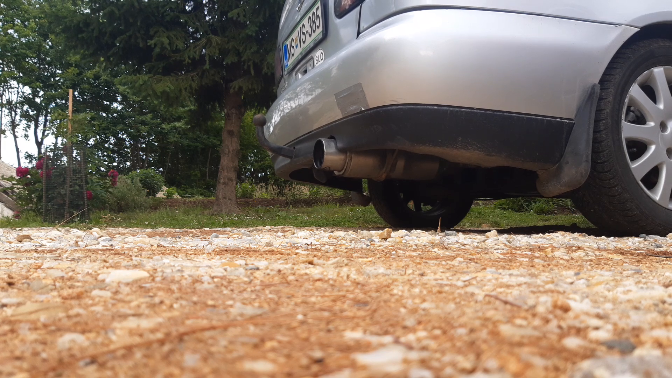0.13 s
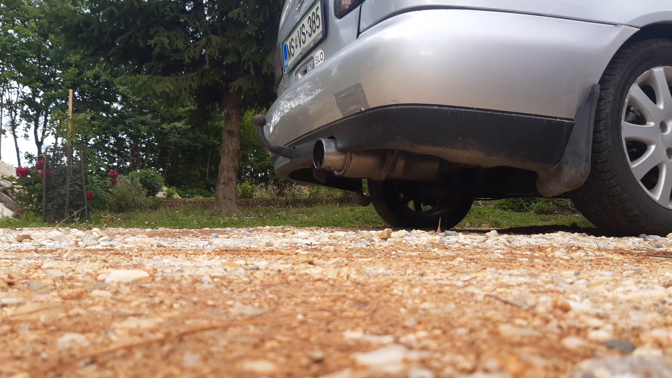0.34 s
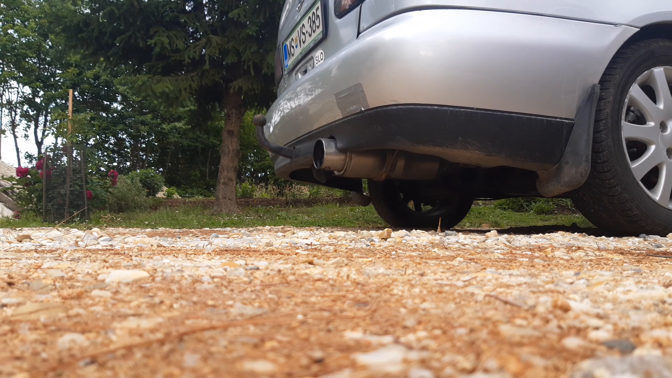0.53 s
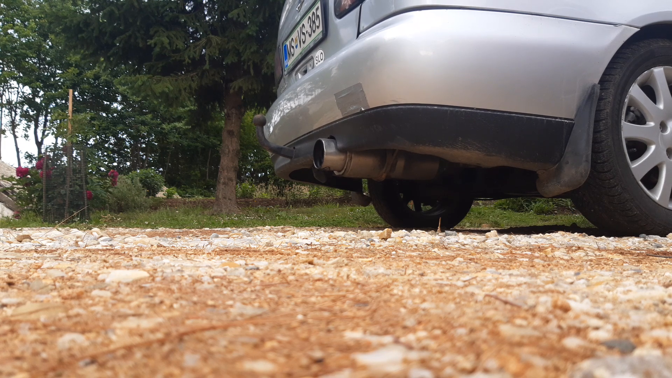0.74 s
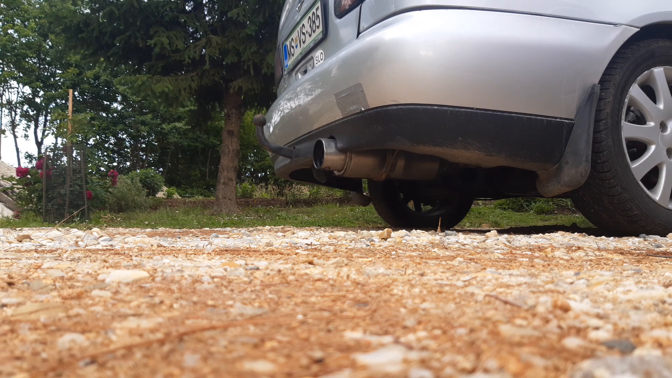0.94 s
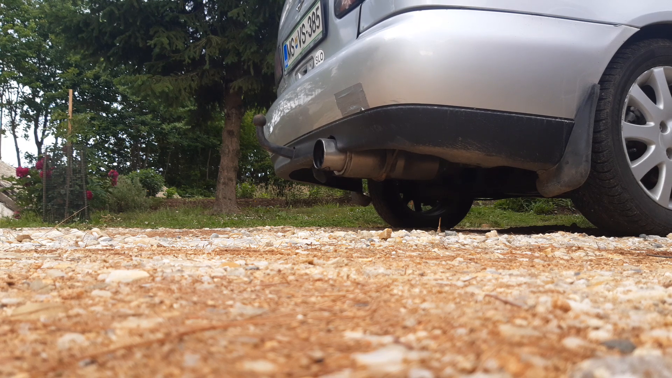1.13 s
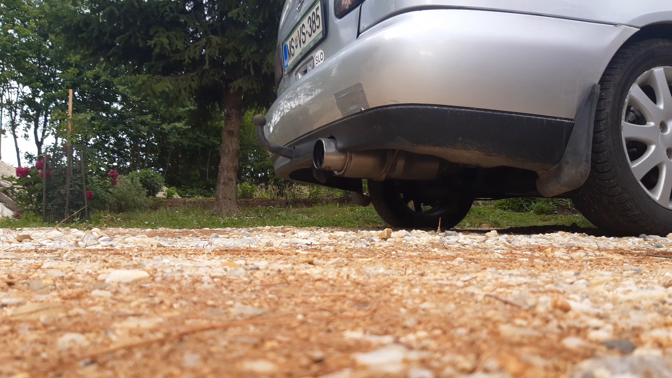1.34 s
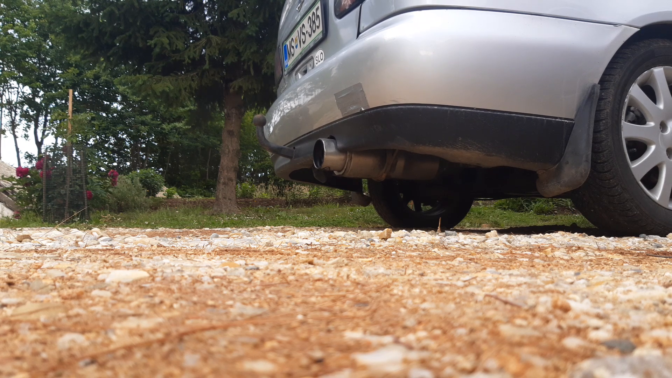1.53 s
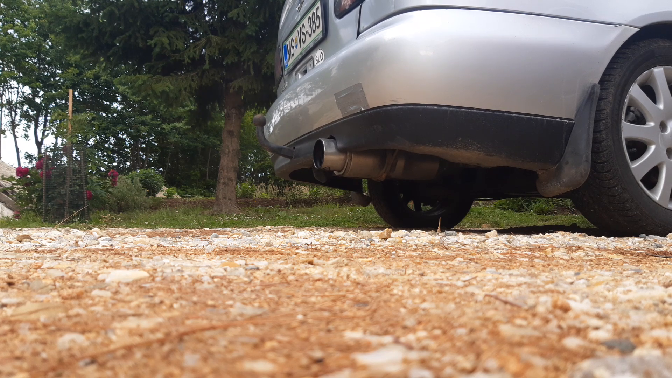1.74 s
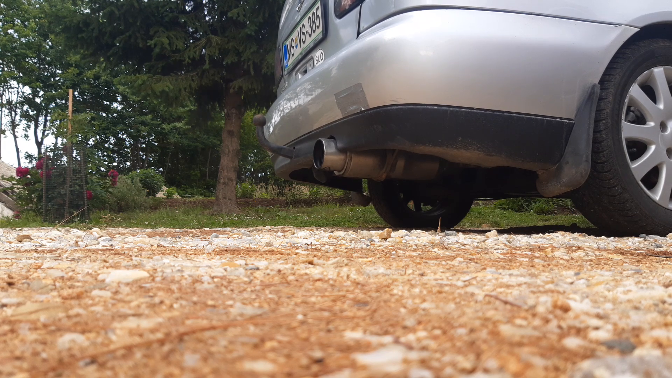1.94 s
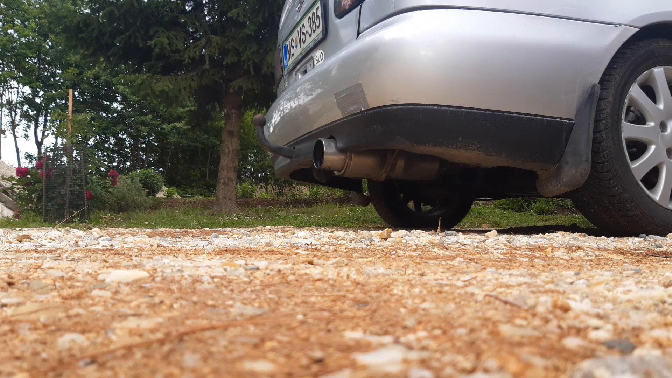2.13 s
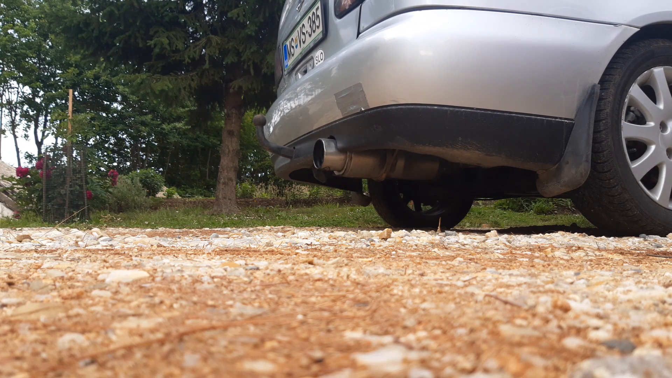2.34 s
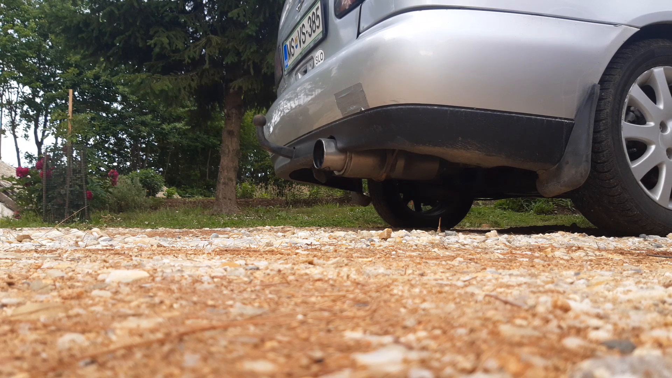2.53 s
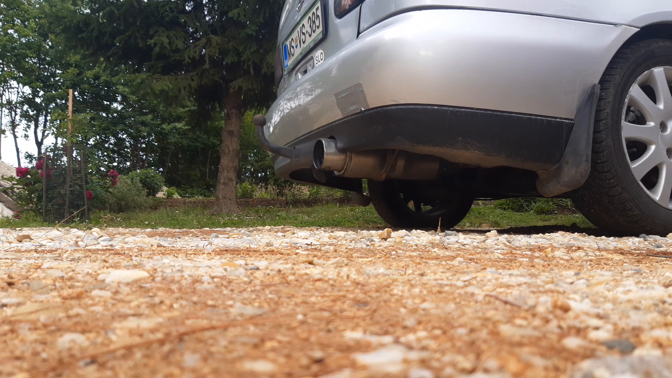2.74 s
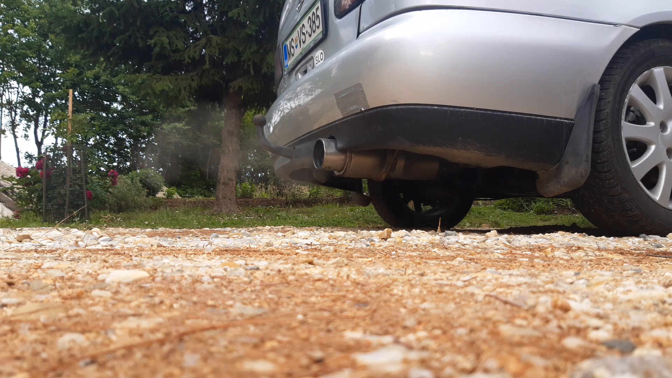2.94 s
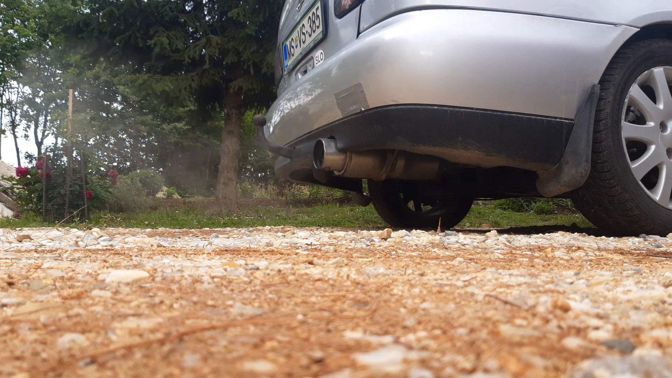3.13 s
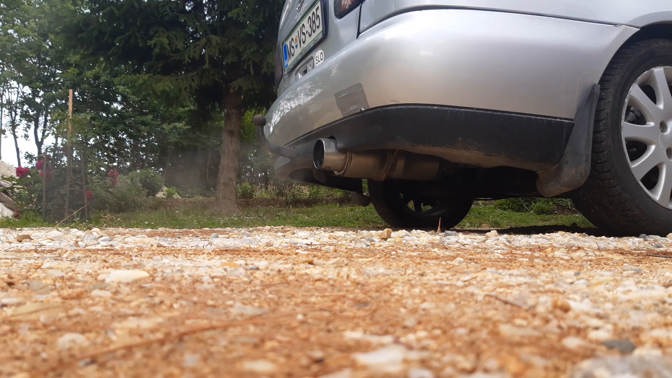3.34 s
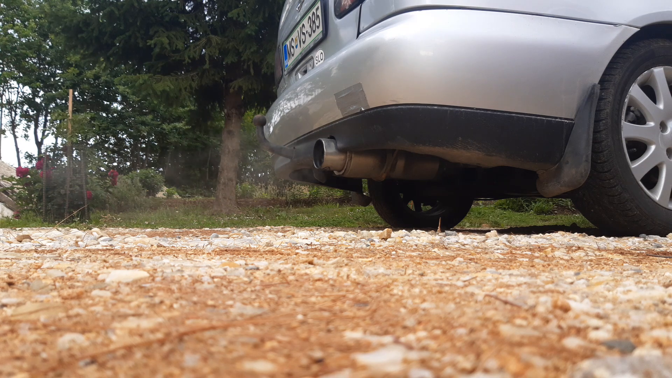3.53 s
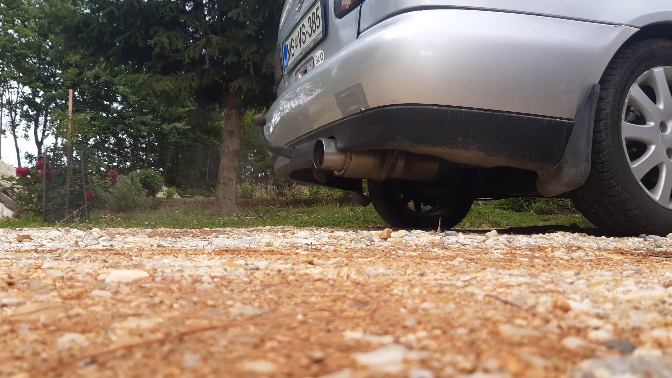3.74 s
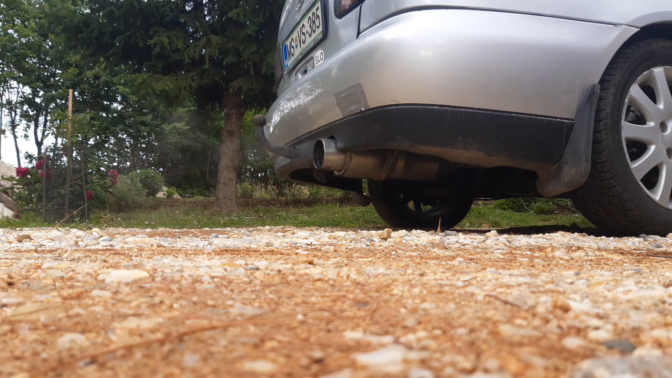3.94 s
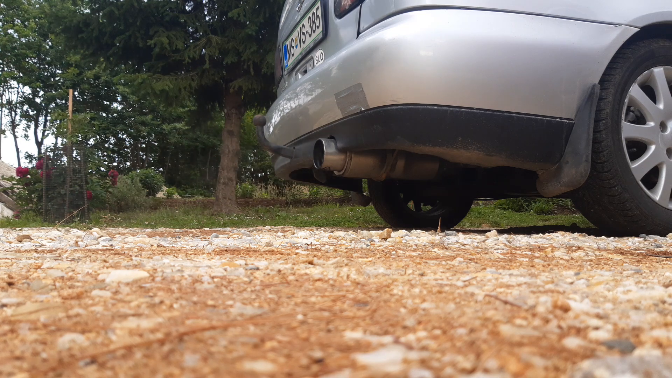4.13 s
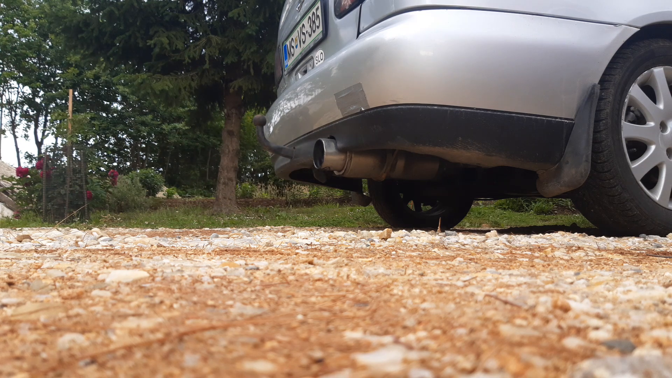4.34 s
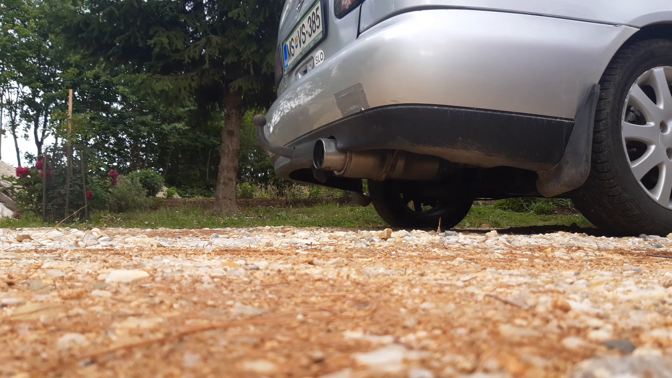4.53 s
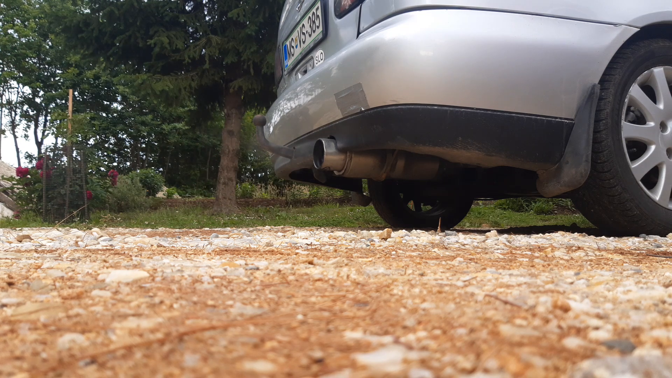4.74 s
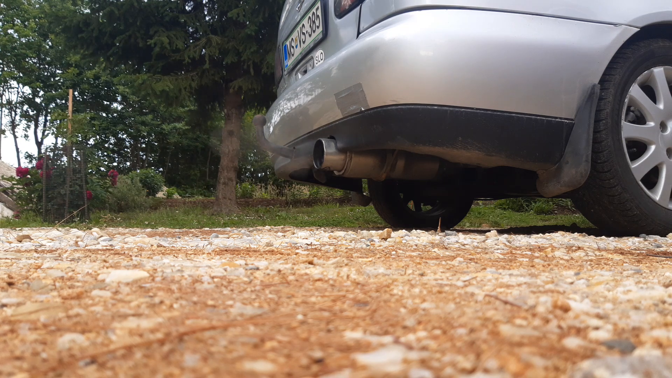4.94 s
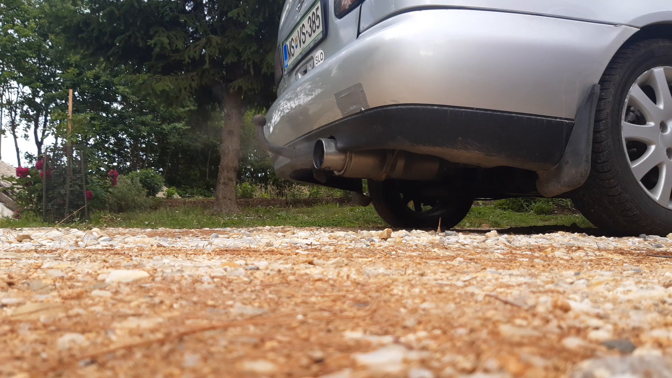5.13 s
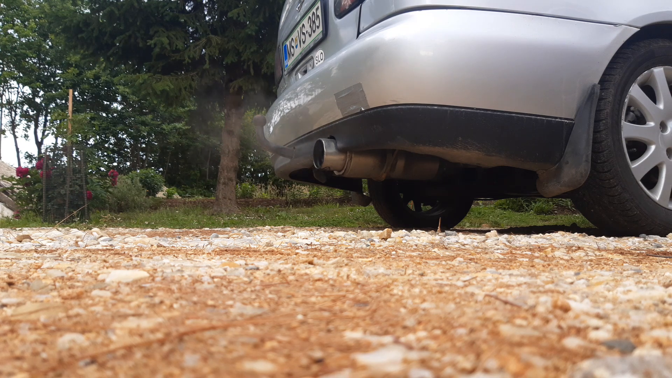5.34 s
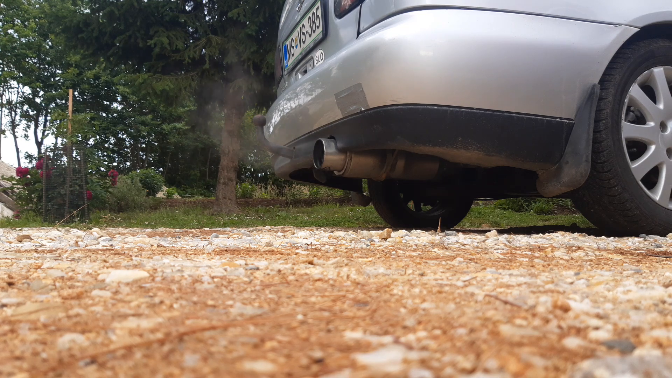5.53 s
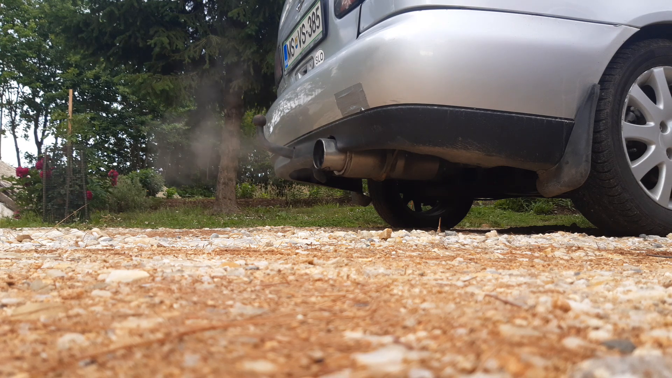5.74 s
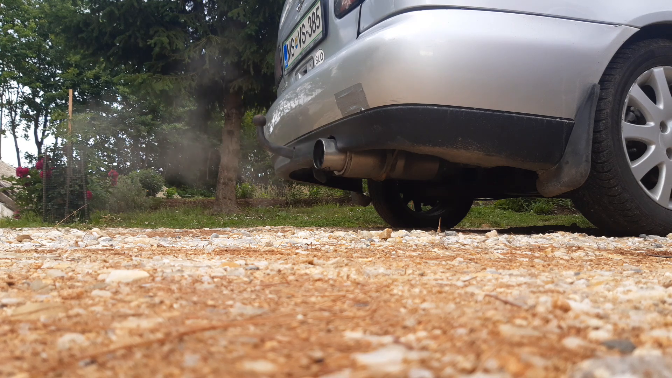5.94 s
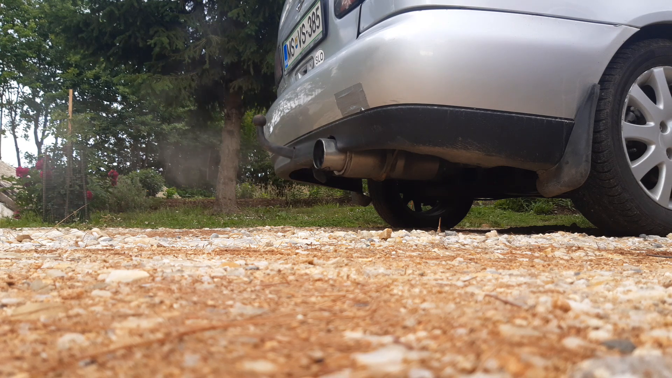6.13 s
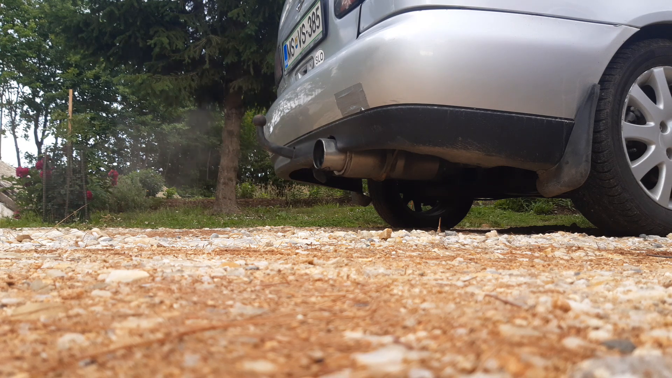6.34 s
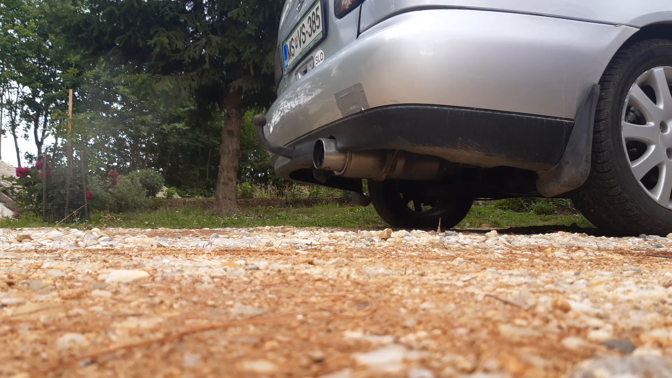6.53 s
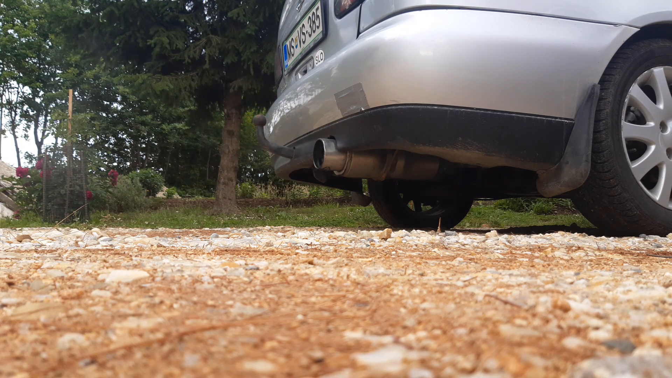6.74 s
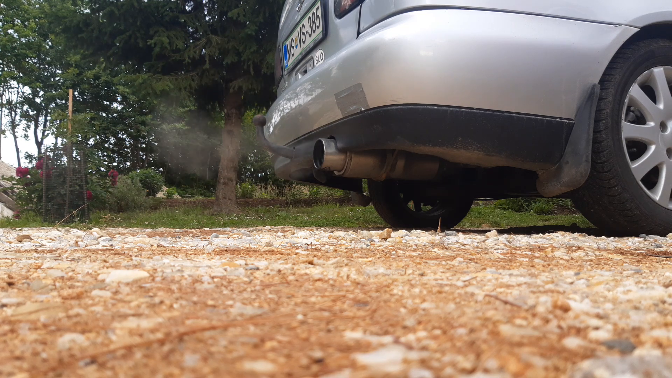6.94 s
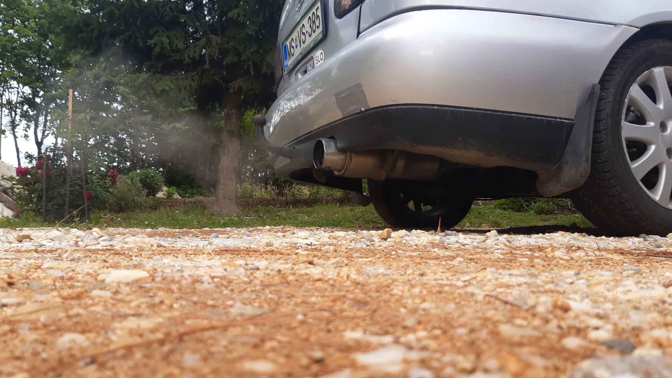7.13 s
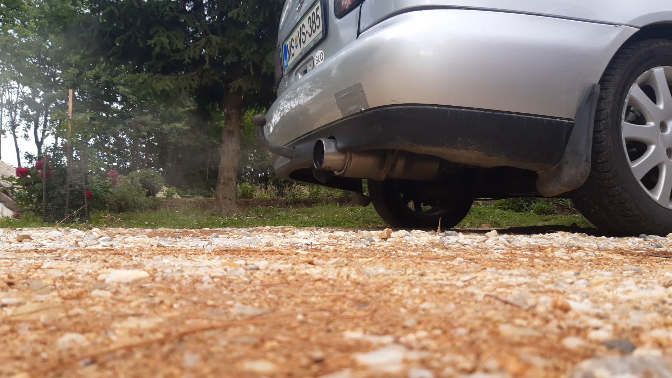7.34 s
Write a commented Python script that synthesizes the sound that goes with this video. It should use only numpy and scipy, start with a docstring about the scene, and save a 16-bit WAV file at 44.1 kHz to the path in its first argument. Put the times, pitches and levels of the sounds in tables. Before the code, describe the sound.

Close to the exhaust of a parked petrol car outdoors, a low, pulsing idle is broken by four short revs. The second is the strongest, with raspy, hissing gas and a quick, high buzz of loose metal. The first three fall away with uneven thumps and pops; the last brings a fainter buzz and is still running high at the end. Faint bird chirps sit far behind the engine.

```python
"""A four-cylinder petrol car idles, heard close to the tailpipe, while a small bird chirps in the trees.
Each firing sends a pressure pulse booming through the exhaust, with a rasp and a hiss of turbulent gas.
A light blip of the throttle ends in burbles and pops. A hard one near 3 s sets loose sheet metal buzzing,
and the engine pops again as it sinks to idle. A third blip burbles away after 6 s; at 7 s a fourth
shakes the sheet once more."""
import sys
import numpy as np
from scipy import signal
from scipy.fft import rfft, irfft, next_fast_len
from scipy.io import wavfile
from scipy.ndimage import uniform_filter1d, map_coordinates

SR = 44100
rng = np.random.default_rng(int(sys.argv[2]) if len(sys.argv) > 2 else 0)


def bounce(signal):
    """Save signal as a 16-bit WAV file at the path given by the first command-line argument."""
    frames = np.transpose(np.atleast_2d(signal))
    limited = np.clip(frames, -1, 1)
    pcm = np.round(limited * 32767).astype(np.int16)
    wavfile.write(sys.argv[1], SR, pcm)


N = 325017
TIME = np.arange(N) / SR
IDLE_HZ, IDLE_CHARGE_DB = 33, -30


# Each entry: one cylinder's departure from the nominal pulse size, as a fraction.
CYLINDER_IMBALANCE = [-0.0035, -0.0074, -0.016, -0.028]

def boom(turns, rate, charge_db, jitter_s=0.005, burble_db=-1.0, coast_limp=0.25):
    """Source and filter: each firing drives the pipe with a Gaussian pulse, widest when coasting."""
    at = firings(turns)
    pull, coast = (c[at] for c in effort(rate))
    burble = burbling()[at]
    uneven = .08 * (IDLE_HZ / rate[at]) ** 2 + .3 * burble  # scatter of size and timing
    width_s = (0.27 + 0.8 * pull + 1.56 * coast) / 1000
    size_error, time_error = rng.standard_normal((len(at), 2)).T
    limp = coast_limp * coast * (-1) ** np.arange(len(at))
    sizes = 1 + np.resize(CYLINDER_IMBALANCE, len(at)) + limp + uneven * size_error
    strength = amp(charge_db[at] + burble_db * burble) * SR / rate[at] / np.sqrt(2)
    t = np.arange(-SR // 100, SR // 100) / SR
    pulses = np.exp(-(t / width_s[:, None]) ** 2 / 2)
    pulses *= (sizes * strength / pulses.sum(axis=1))[:, None]
    moments = (at + np.round(jitter_s * SR * uneven * time_error)) / SR
    return pipe(impulses((moments[:, None] + t).ravel(), -pulses.ravel()))


# Each row: frequency in Hz, gain of pipe and silencer in dB.
PIPE_RESPONSE = [(20, -56.5), (33, -22), (50, -5.5), (70, 6.5), (86, 3), (110, 7), (132, -6), (141, -12.5),
                 (166, 7), (195, -21), (230, -19), (252, -22), (280, -34), (318, -20), (460, -34.5),
                 (1500, -75)]

def pipe(x):
    """Causality: as a minimum-phase filter, the exhaust rings only after each push."""
    def minimum_phase(hz):
        cepstrum = irfft(np.log(gain(PIPE_RESPONSE, hz)))
        cepstrum[1:len(hz) - 1] *= 2
        cepstrum[len(hz):] = 0
        return np.exp(rfft(cepstrum))
    return filtered(x, minimum_phase)


# Each row: start and end of a burble in seconds.
OVERRUN_SPANS = [(1.75, 1.83), (3.879, 4.42), (6.029, 6.42)]

def burbling(fade_s=0.039):
    """Overrun: 1 while the engine fires unevenly on a shut throttle, fading to 0 outside."""
    return sum(np.clip(.5 + np.minimum(TIME - start, end - TIME) / fade_s, 0, 1)
               for start, end in OVERRUN_SPANS)


# Each row: time in seconds, peak level of the thump in dB.
LATE_FIRINGS = [(1.786, -17.5), (1.826, -16.5), (1.932, -24.5), (2.028, -26), (3.876, -15), (3.947, -19.5),
                (3.984, -21.5), (4.031, -19), (4.072, -28.5), (6.031, -15), (6.074, -27), (6.182, -15.5),
                (6.222, -15), (6.269, -23.5), (6.338, -20)]

def pops(crack_db=-22):
    """Impulse response: a cylinder that catches late thumps in the pipe and cracks in the silencer."""
    times, db = np.transpose(LATE_FIRINGS)
    def bang(path):
        peak = np.abs(path(impulses(np.zeros(1), np.ones(1)))).max()
        return path(impulses(times, -amp(db))) / peak
    return bang(pipe) + amp(crack_db) * bang(silencer)


# Each row: centre frequency in Hz, bandwidth in Hz, gain in dB.
SILENCER_MODES = [(222.8, 6.1, -2), (313.7, 11, 0.5), (343, 29, -6), (390.6, 38, -3.5), (424.4, 44, -3.5),
                  (477, 34, -7), (563, 30, -16), (649.4, 16, -7.5)]

def silencer(x):
    """Cavity resonance: the silencer rings at its normal modes."""
    return ring(x, SILENCER_MODES)


# Each entry: relative strength of one cylinder's valve crack.
VALVE_STRENGTHS = [1, 1.1, 1.1, 1.3]

def rasp(turns, rate, scatter_db=1, pull_scrape=0.36):
    """Modal excitation: valve cracks and gas noise ring the silencer; speed cleans it, pull roughens it."""
    at = firings(turns)
    scatter = amp(scatter_db * rng.standard_normal(len(at)))
    sizes = np.resize(VALVE_STRENGTHS, len(at)) * scatter / np.sqrt(rate[at])
    cracks = unit(silencer(impulses(TIME[at], sizes)))
    scrape = unit(silencer(rng.standard_normal(N) * puffs(turns, depth=0.7, sharpness=3.7)))
    rough = np.sqrt(IDLE_HZ / rate) + pull_scrape * effort(rate)[0]
    mixed = (cracks + rough * scrape) / np.hypot(1, rough)
    return coloured(mixed, [(120, -23.5), (230, 1), (680, -5.5), (1100, -31.5)])


# Each row: frequency in Hz, relative spectral level in dB.
MOUTH_SPECTRUM = [(300, -23.5), (560, 0.5), (660, -2), (760, -0.5), (830, -2), (872, -0.5), (925, -7.5),
                  (1080, -5), (1170, -14.5), (1380, -10), (1650, -23), (2600, -38.5)]

def rush(turns, rate, order_count=72, odd_db=-6):
    """Turbulence at the mouth: noise gives way to a snarl of crank harmonics as speed rises."""
    k = np.arange(order_count + 1)  # the even harmonics are firing orders
    orders = amp(odd_db * (k % 2)) * np.exp(2j * np.pi * rng.random(len(k))) * (k > 0)
    revolution = irfft(orders, 16 * order_count)
    cycles = map_coordinates(revolution, [turns / 2 % 1 * len(revolution)], order=1, mode="grid-wrap")
    snarl = coloured(cycles * np.sqrt(rate), MOUTH_SPECTRUM)
    noise = coloured(rng.standard_normal(N), MOUTH_SPECTRUM)
    tonal_share = np.clip(.35 + .009 * (rate - rate.min()), 0, 1)
    flow = np.sqrt(tonal_share) * snarl + np.sqrt(1 - tonal_share) * noise
    return unit(flow * puffs(turns, depth=0.11, sharpness=3.2))


def jet(turns, spectrum):
    """Jet noise: gas hisses out of the pipe in shallow, fluttering puffs."""
    noise = rng.standard_normal(N) * puffs(turns, depth=0.2, sharpness=3) * amp(1.1 * wobble(60))
    return coloured(noise, spectrum)


# The jet's body and its fine spray. Each row: frequency in Hz, relative spectral level in dB.
HISS_SPECTRUM = [(800, -12.5), (1700, -0.5), (2150, 4), (2650, 1), (3000, -2), (4100, -3), (4600, -7),
                 (6400, -7), (7200, -15.5), (8200, -16.5), (9200, -38.5), (12000, -50)]
FIZZ_SPECTRUM = [(7000, -51.5), (9200, -35.5), (10800, -16), (12200, -2.5), (14200, -4.5), (15700, -5)]
# Each law: level at idle in dB, then dB added per dB of charge, per doubling of speed,
# at full pull and at full coasting.
RASP_LEVEL = (-46, 0.75, -4.5, 5.5, -1)
RUSH_LEVEL = (-58.5, 0.2671, 6, 4, -1)
HISS_LEVEL = (-73, 0.28, 9, -2, -2.5)
FIZZ_LEVEL = (-71, 0.2, 5, 1.5, -2)

def gas(turns, rate, charge_db, lag_s=0.069):
    """Flow noise: each layer follows power laws of speed and charge; the flow lags the charge."""
    pull, coast = effort(rate)
    def level(idle_db, per_charge, doubling_db, pull_db, coast_db):
        drive_db = per_charge * (charge_db - IDLE_CHARGE_DB) + pull_db * pull + coast_db * coast
        lagged_db = np.interp(TIME - lag_s, TIME, drive_db)
        return amp(idle_db + doubling_db * np.log2(rate / IDLE_HZ) + lagged_db)
    layers = [(rush(turns, rate), RUSH_LEVEL), (rasp(turns, rate), RASP_LEVEL),
              (jet(turns, HISS_SPECTRUM), HISS_LEVEL), (jet(turns, FIZZ_SPECTRUM), FIZZ_LEVEL)]
    return sum(sound * level(*law) for sound, law in layers)


def tip(turns, rate, ring_hz=872, width_hz=36, ring_db=-48.0):
    """Resonance: the tailpipe's tip sings as one high engine order sweeps across its mode."""
    multiple = 25 / 2  # 25th crank order, at two firings a revolution
    detuning = (multiple * rate - ring_hz) / (width_hz / 2)
    level = amp(ring_db + 4.6 * wobble(30)) / np.hypot(1, detuning)
    return level * np.sin(2 * np.pi * multiple * turns + 0.31 * wobble(40))


# Each row: centre frequency in Hz, bandwidth in Hz, relative gain in dB.
SHEET_MODES = [(3180, 200, -3.5), (3750, 240, -0.5), (4130, 200, -0.5), (5050, 640, -10), (6280, 400, -4.5),
               (8060, 330, -7), (11140, 1200, -8), (13400, 1100, -1), (14400, 580, -9), (15400, 790, -13)]
# Each row: time of reaching full level in seconds, hold in seconds, level in dB.
SHEET_BUZZES = [(2.903, .075, -48.5), (6.981, .02, -60), (7.266, 0.056, -62.5)]

def buzz(turns, attack_s=0.038, fall_db_per_s=222):
    """Forced vibration: the shaking exhaust makes a loose sheet chatter at the firing rate."""
    chatter = rng.standard_normal(N) * puffs(turns, depth=0.46, sharpness=3) * amp(1.7 * wobble(400))
    level = np.zeros(N)
    for start, hold, db in SHEET_BUZZES:
        rise = np.clip(1 + (TIME - start) / attack_s, 0, 1)
        level += rise * amp(db - fall_db_per_s * np.maximum(TIME - start - hold, 0))
    return level * unit(ring(chatter, SHEET_MODES))


def intake(rate, lead_s=.04, level_db=-77):
    """Narrow-band flow noise: air whistles past the throttle just before the crank gathers speed."""
    opening = np.interp(TIME + lead_s, TIME, effort(rate)[0])
    return amp(level_db) * opening * unit(ring(rng.standard_normal(N), [(7750, 420, 0)]))


# Each row: start in seconds, level in dB, frequency in Hz from which the whistle falls.
BIRD_CALLS = [(.548, -66, 3790), (0.74, -63.5, 3780), (2.244, -66, 3800), (2.39, -69.5, 3540),
              (4.056, -63, 3800), (4.233, -64, 3900), (5.481, -58, 3870)]

def bird(drop_hz=1250, lisp_db=-13, lisp_hz=5100, echo_db=-2):
    """Frequency modulation: a high lisp, then a husky falling whistle, reverberating among the trees."""
    drop_s, swell_s, lisp_lead_s, echo_t60_s, husk_hz = .028, .018, .022, .33, 280
    t = np.arange(SR // 4) / SR
    swell = (t / swell_s) ** 2 * np.exp(2 - 2 * t / swell_s)
    def whistle(hz):
        return swell * np.sin(2 * np.pi * np.cumsum(hz + husk_hz * wobble(1500)[:len(t)]) / SR)
    calls = np.zeros(N + SR)
    for start, db, hz in BIRD_CALLS:
        lisp = whistle(lisp_hz) + whistle(hz)
        fall = whistle(hz - drop_hz * (1 - np.exp(-t / drop_s)))
        calls[round((start - lisp_lead_s) * SR):][:len(t)] += amp(db + lisp_db) * lisp
        calls[round(start * SR):][:len(t)] += amp(db) * fall
    trees = rng.standard_normal(len(t)) * amp(-60 * t / echo_t60_s)
    return calls[:N] + amp(echo_db) * signal.fftconvolve(calls, trees / np.linalg.norm(trees))[:N]


# Each row: frequency in Hz, level in dB.
WHINE_TONES = [(915, -80), (1108, -74)]
# Each row: centre frequency in Hz, bandwidth in Hz, relative gain in dB.
BAY_MODES = [(1310, 99, -0.5), (2150, 160, -14)]

def background(bay_db=-74.0, air_db=-58.5):
    """Superposition: the car's faint whine and the engine bay's whir add to the murmur of open air."""
    whine = sum(amp(db + 0.96 * wobble(2.6)) * np.sin(2 * np.pi * hz * TIME + 0.4 * wobble(7.6))
                for hz, db in WHINE_TONES)
    bay = unit(ring(ring(rng.standard_normal(N), BAY_MODES), [(1380, 2000, 0)]))
    air = coloured(rng.standard_normal(N), [(20, 10.5), (100, -9.0), (1000, -28.5), (9000, -49.0)])
    return whine + amp(bay_db) * bay + amp(air_db) * air


def effort(rate, full_pull_hz_per_s=136, full_coast_hz_per_s=60):
    """The crank's acceleration as pull and its deceleration as coasting, each 0-1."""
    change = np.gradient(uniform_filter1d(rate, SR // 10)) * SR
    return np.clip(change / full_pull_hz_per_s, 0, 1), np.clip(-change / full_coast_hz_per_s, 0, 1)


def firings(turns):
    """Sample index of every firing."""
    return np.flatnonzero(np.diff(np.floor(turns))) + 1


def puffs(turns, depth, sharpness):
    """Amplitude modulation: an envelope of rms 1 that jumps at each firing and decays."""
    return unit(1 - depth + depth * unit(np.exp(-sharpness * (turns % 1))))


def impulses(times, sizes):
    """One impulse at each time."""
    return np.bincount(np.clip(np.round(times * SR).astype(int), 0, N - 1), sizes, N)


def ring(x, modes):
    """Modal sum: x through resonators of alternating sign, each a centre (Hz), width (Hz) and gain (dB)."""
    return filtered(x, lambda f: sum((-1) ** k * amp(db) * 1j * f * width / (hz**2 - f**2 + 1j * f * width)
                                     for k, (hz, width, db) in enumerate(modes)))


def coloured(x, spectrum):
    """x shaped by a spectrum of (Hz, dB) points, at rms 1."""
    return unit(filtered(x, lambda hz: gain(spectrum, hz)))


def filtered(x, response):
    """Convolution: the spectrum of x times a frequency response."""
    size = 2 * next_fast_len((N + SR) // 2)
    return irfft(rfft(x, size) * response(np.fft.rfftfreq(size, 1 / SR)), size)[:N]


def gain(points, hz):
    """Gain of (Hz, dB) points joined on a log axis."""
    f, db = np.transpose(points)
    return amp(np.interp(np.log(hz + 1), np.log(f + 1), db))


def wobble(rate):
    """A smooth random curve, rate knots a second."""
    return map_coordinates(rng.standard_normal(int(N * rate / SR) + 4), [TIME * rate])


def amp(db):
    """Decibels as amplitude."""
    return 10 ** (np.asarray(db) / 20)


def unit(x):
    """x at rms 1."""
    return x / np.sqrt(np.mean(x ** 2) + 1e-20)


# Each row: time in seconds, firings per second.
FIRING_RATE = [(0.0, 33.48), (0.6, 32.6), (1.21, 32.96), (1.4, 47.44), (1.55, 51.44), (1.7, 51.49),
               (1.9, 38.83), (2.2, 33.49), (2.79, 33.63), (2.92, 47.48), (3.05, 69.22), (3.17, 88.15),
               (3.31, 91.08), (3.5, 79.49), (3.7, 67.34), (3.85, 57.43), (4.0, 50.14), (4.2, 40.89),
               (4.6, 33.82), (5.0, 33.24), (5.55, 35.7), (5.67, 44.23), (5.8, 54.86), (5.95, 59.94),
               (6.15, 52.97), (6.42, 37.86), (6.76, 33.9), (6.85, 40.44), (7.0, 53.01), (7.12, 65.43),
               (7.2, 71.47), (7.37, 69.23)]
# How hard the cylinders push. Each row: time in seconds, charge in dB.
CYLINDER_CHARGE = [(0, -31.5), (1.05, -33), (1.41, -20), (1.54, -27.5), (1.88, -31), (2.21, -39.5),
                   (2.71, -33.5), (2.89, -15.5), (3.14, -16.5), (3.3, -20), (3.42, -14), (3.82, -20),
                   (3.93, -29), (4.08, -32), (4.24, -43), (4.75, -44.5), (5.5, -30.5), (5.6, -22.5),
                   (5.95, -22.5), (6.12, -29), (6.33, -25.5), (6.42, -38.5), (6.67, -37.5), (6.85, -23.5),
                   (7.05, -19), (7.37, -25)]

def scene(start_phase=.555):
    """Phase locking: one crank times boom, gas, tip and buzz; the charge drives the boom and the gas."""
    rate = np.interp(TIME, *np.transpose(FIRING_RATE))
    charge_db = np.interp(TIME, *np.transpose(CYLINDER_CHARGE))
    turns = start_phase + np.cumsum(rate) / SR  # firings so far
    exhaust = boom(turns, rate, charge_db) + pops() + gas(turns, rate, charge_db) + tip(turns, rate)
    return (exhaust + buzz(turns) + intake(rate) + bird() + background())[None]


def record(dry, top_hz=15750):
    """Band limiting: an ideal low-pass filter removes the highest treble."""
    return filtered(dry[0], lambda hz: hz < top_hz)[None]


dry = scene()
out = record(dry)
bounce(out)
```